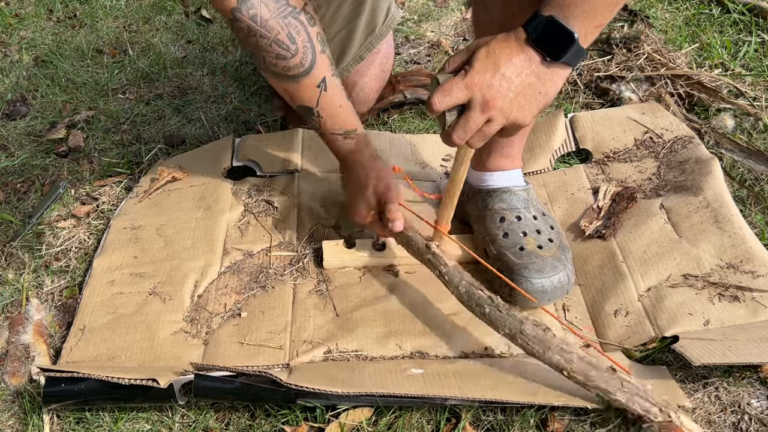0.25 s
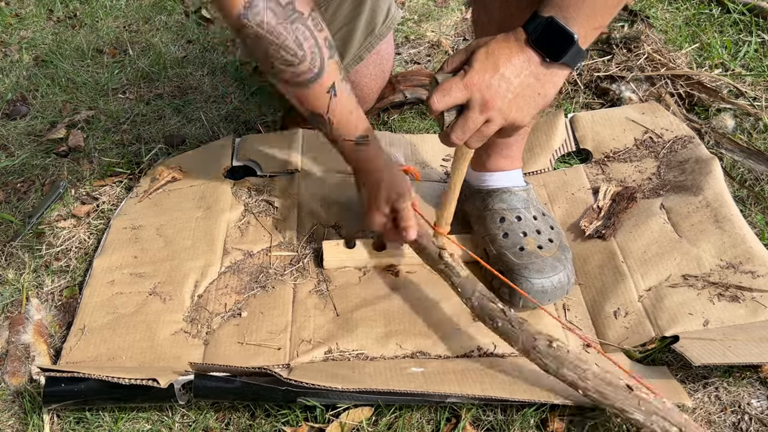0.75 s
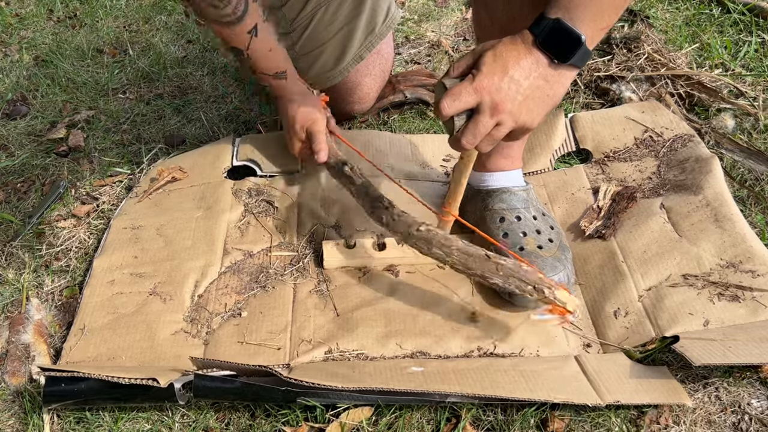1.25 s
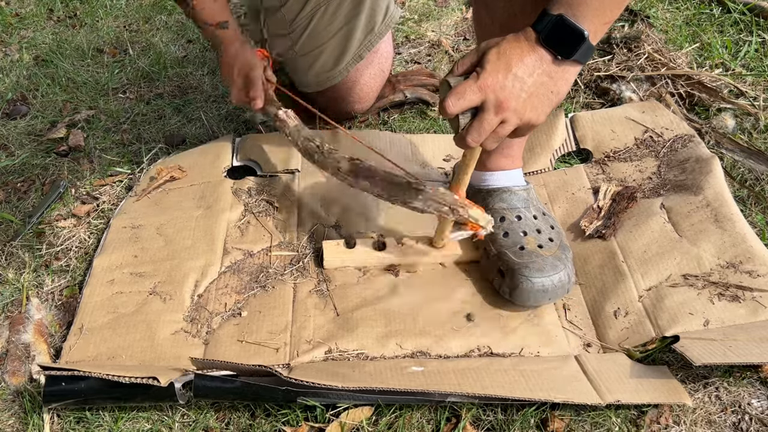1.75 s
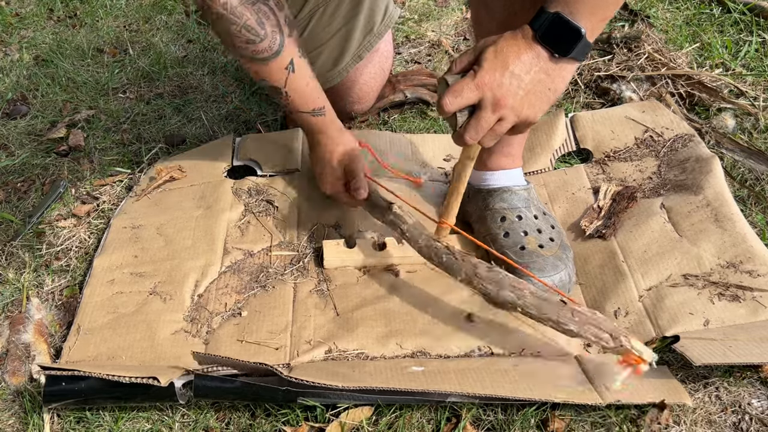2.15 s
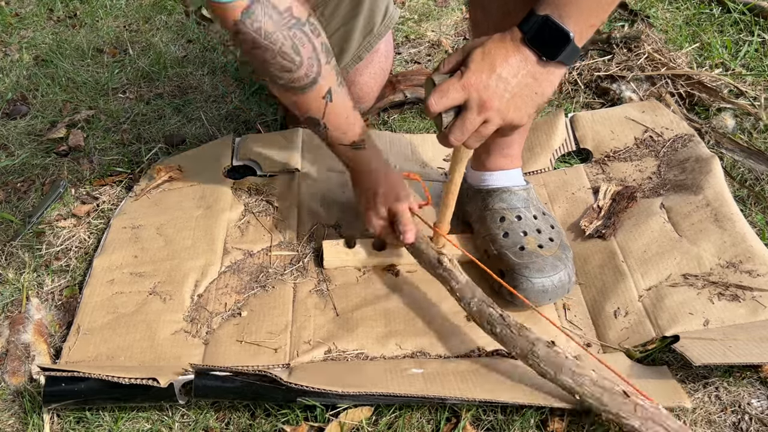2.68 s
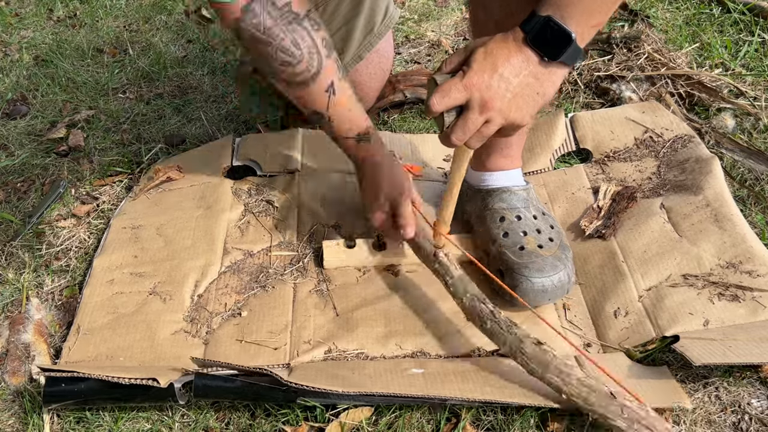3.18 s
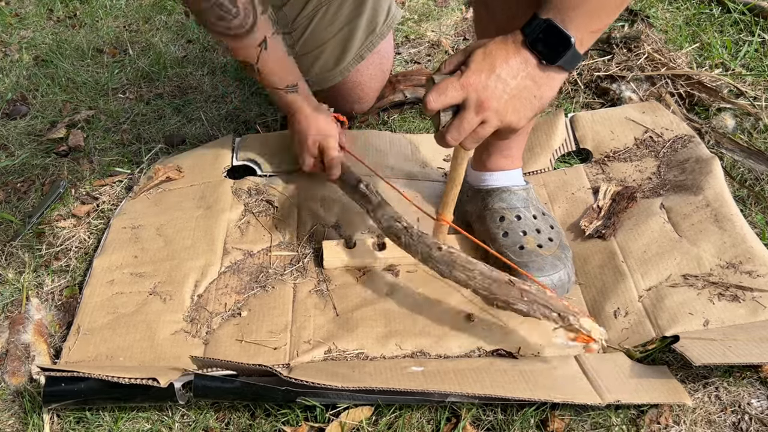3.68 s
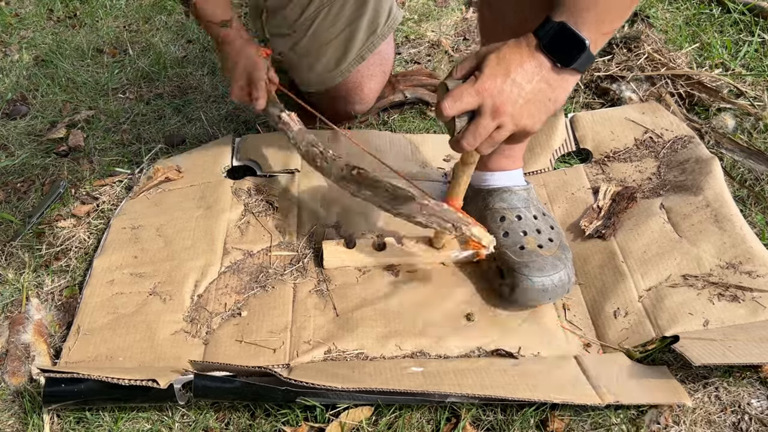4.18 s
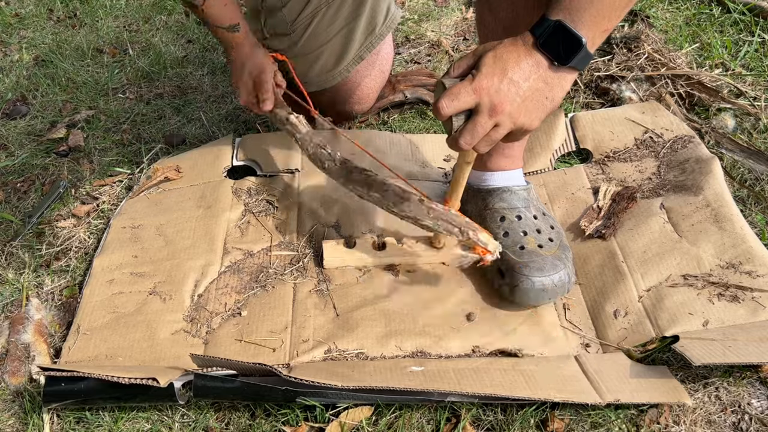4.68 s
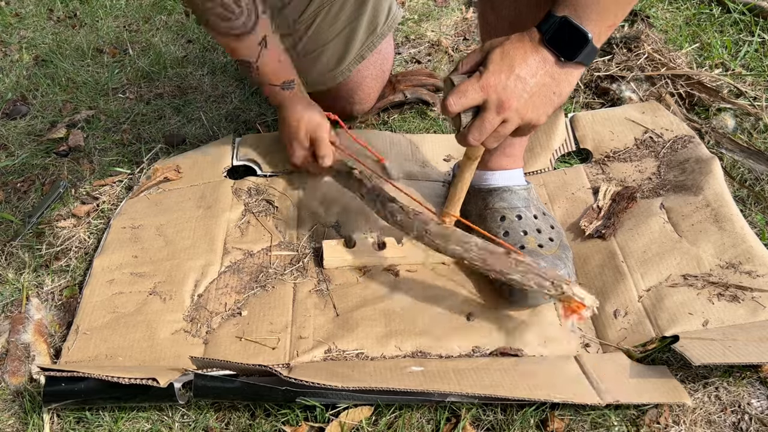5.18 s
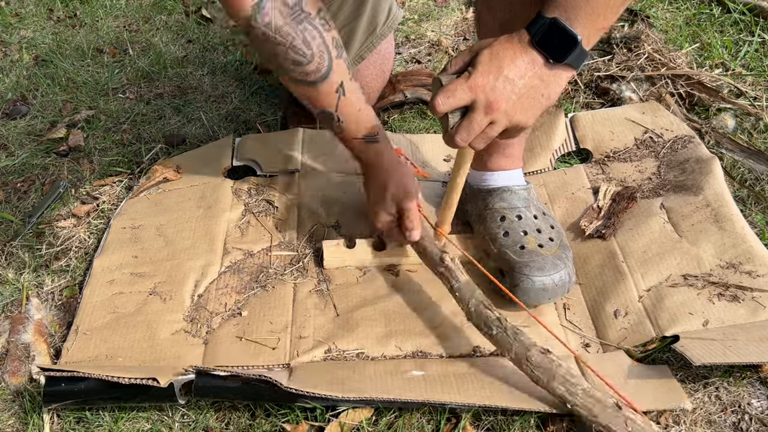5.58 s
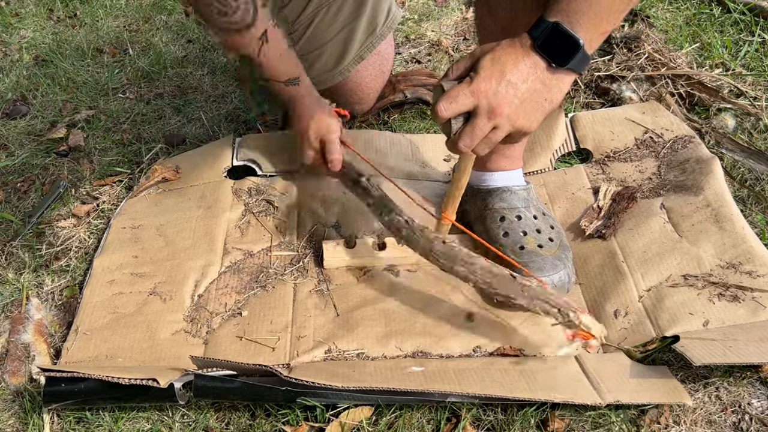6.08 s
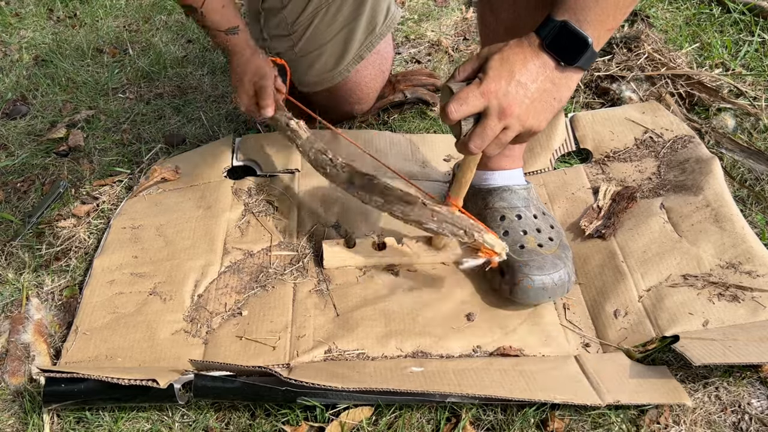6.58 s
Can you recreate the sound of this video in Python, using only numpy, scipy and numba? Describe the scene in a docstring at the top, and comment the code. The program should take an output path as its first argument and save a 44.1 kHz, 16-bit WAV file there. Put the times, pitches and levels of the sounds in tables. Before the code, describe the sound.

Outdoors in dry grass, close to a phone microphone, a cord bow spins a wooden spindle in a small board on cardboard. From 0 to nearly 7 seconds it grinds without a break, each stroke about 0.3 seconds: a stronger, boomier push, then a lighter, raspier pull. Every stroke stutters with gritty friction and a dry high hiss, its hollow tone climbing slightly. Wind buffets the microphone in deep, lumpy thumps from about 0.5 to 1.1 seconds, then dies down; small soft bumps return near 3.5 to 3.8, 5 and 6 seconds. The bow scuffs straw and card in short ticks and scrapes, with a sharper woody knock at 4.5 and a smaller one near 5.2. Behind are faint rustling leaves, a steady high insect band and a thin cricket chirping several times a second. The last stroke ends around 6.9 seconds.

```python
"""Dry grass in a field: a cord bow spins a wooden spindle in a hearth board on cardboard, close to a phone.
Each stroke grinds: random clicks ring the board's resonances as boom and rasp, and the tip's as hiss.
The bow's end scuffs card and straw in short bursts of the same kind of clicks.
Wind buffets the two microphone ports as low noise and single thumps, hardest early on.
Behind lie leaves and grass, a steady band of insects and one chirping cricket, all filtered noise."""
import sys
import numpy as np
from scipy import signal
from scipy.fft import rfft, irfft
from scipy.io import wavfile
from scipy.ndimage import uniform_filter1d
from numba import njit

SR = 44100
rng = np.random.default_rng(int(sys.argv[2]) if len(sys.argv) > 2 else 0)


def unload_audio(sound):
    """Save the sound as a 16-bit wav file, at the path given as the first command line argument."""
    columns = np.transpose(np.atleast_2d(sound))
    # keep every value between -1 and 1, then stretch to whole-number steps
    steps = np.round(np.clip(columns, -1, 1) * 32767)
    wavfile.write(sys.argv[1], SR, steps.astype(np.int16))


N = 301644

# bow strokes, push and pull in turn:
# (start [s], rasp level [dB], board boom level [dB], swell: tilt from -swell at the start to +swell at the end [dB])
BOW_STROKES = [(-0.12, -21.5, -20.5, 0), (0.189, -26.5, -26.5, 1.5), (0.493, -23, -20.5, -2.5),
               (0.783, -29, -26.5, 6.5), (1.11, -23.5, -21, -6), (1.423, -28, -27.5, 1.5),
               (1.733, -24, -21, -7), (2.032, -28.5, -29.5, 0.5), (2.334, -25, -24, -6.5),
               (2.687, -28, -23.5, -2.5), (2.938, -25, -22, -4), (3.252, -27.5, -25, -0.5),
               (3.516, -26, -21, -3.5), (3.846, -26.5, -24.5, 1), (4.139, -24, -19.5, -5),
               (4.423, -27.5, -26.5, 0.5), (4.738, -24, -22, 1), (5.016, -28, -28.5, 1.5),
               (5.345, -23, -22, -2.5), (5.633, -27, -28, 0.5), (5.935, -24.5, -23.5, 1),
               (6.241, -28.5, -30, 1), (6.544, -23.5, -21, -2.5)]
LAST_TURN_S = 6.86  # end of the last stroke
# booming modes of the hearth board: (centre [Hz], width [Hz], relative level on the push [dB], on the pull [dB])
BOOM_MODES = [(306.3, 32.6, 3.5, -5.5), (415.3, 71, -6, 1.5), (240, 180, -12.5, -7)]
# rasping modes of the board: (centre [Hz], width [Hz], relative level on the push [dB], on the pull [dB])
RASP_MODES = [(484, 230, -6.5, -9), (802, 198, -7, -4.5), (1235, 270, -4, -4.5), (1740, 480, -7.5, -8),
              (2123, 530, -10, -6), (2640, 580, -7.5, -8.5), (3050, 810, -15.5, -11.5),
              (4353, 350, -16.5, -14), (6190, 290, -22, -16)]
# spindle tip and dry fibres: (centre [Hz], width [Hz], relative level [dB])
TIP_MODES = [(4370, 810, 5.5), (6330, 650, 5.5), (8730, 1230, 5.5), (11700, 1900, 7.5), (14030, 6800, 5.5)]


def drill():
    """The tip catches and slips: slips boom in the board, grit rasps and hisses."""
    s, *levels_db = np.transpose(strokes())
    # the bow's speed ramps straight between rows; amplitude grows as its square
    speeds = np.sqrt(undb(levels_db))
    rasp_gain, boom_gain, hiss_gain = np.square(curves(np.transpose([s, *speeds])))
    chatter_db = 1.17 * walk(24.97)  # the spindle wobbles, pressure comes and goes within a turn

    slips = svf(svf(grit(1200, 0.58), 352.0, 390.0), 300.0, 550.0)
    boom_flicker_db = 0.19 * chatter_db + 2.1 * walk(12)
    boom = boom_gain * undb(boom_flicker_db) * board(slips, BOOM_MODES)
    rasp = rasp_gain * undb(chatter_db) * rasping()
    hiss_flicker_db = chatter_db + 2.7 * walk(100)
    hiss = hiss_gain * undb(hiss_flicker_db) * ring(grit(15000, 1.0), TIP_MODES)

    low = from_front(boom, 0.072, -1.0) + from_front(rasp, 0.24, -0.88)
    return low + from_side(1.6 * hiss, 0.36)


def strokes():
    """Rows of time and rasp, boom, hiss level: every stroke follows the push or pull shape, tilted by its swell."""
    # push, from a full stop, leaning in late; pull, whipped back at once, easing off early:
    # (share of the stroke's length [0-1], rasp [dB], boom [dB], hiss [dB]), relative to the stroke's levels
    push_shape = [(0, -31.5, -40, -27), (0.15, -18.5, -22.5, -10.5), (0.28, -7, -8.5, -5),
                  (0.55, 0, 1.5, -1), (0.75, -3.5, -1.5, 2), (0.88, -8.5, -11.5, -2.5)]
    pull_shape = [(0, -12.5, -15, -4.5), (0.15, -7, -17.5, -2.5), (0.33, -0.5, -1.5, 1), (0.68, -3, -1, -1),
                  (0.85, -16, -17.5, -8.5)]
    # base hiss level at a rasp of -25.5 dB [dB]; rise of hiss per dB of rasp [dB]
    base_hiss_db, hiss_follows = -39.5, 0.63
    ends = [row[0] for row in BOW_STROKES[1:]] + [LAST_TURN_S]
    rows = []
    for k, ((s, rasp_db, boom_db, swell_db), end) in enumerate(zip(BOW_STROKES, ends)):
        hiss_db = base_hiss_db + hiss_follows * (rasp_db + 25.5)
        stroke_db = (rasp_db, boom_db, hiss_db)
        for share, *shape_db in (push_shape, pull_shape)[k % 2]:
            tilt_db = swell_db * (2 * share - 1)
            rows.append((s + share * (end - s), *np.add(stroke_db, shape_db) + tilt_db))
    return rows + [(LAST_TURN_S, *np.add(stroke_db, pull_shape[0][1:]))]


def rasping():
    """Shared catches and each mode's own fibres ring the upper modes; every mode drifts and stutters alone."""
    wander_hz = 50  # spread of the modes' drift as the pressure shifts
    push, catches, out = pushing(), level(grit(700, 1.65), 0), 0
    for hz, width, push_db, pull_db in RASP_MODES:
        drift = wander_hz / hz * walk(12)
        force = 0.7 * catches + level(grit(2500, 0.6), 0)
        stutter_db = 3.4 * walk(55) + 3.2 * walk(18)
        db = -1.2 + pull_db + push * (push_db - pull_db) + stutter_db
        mode = svf(svf(force, hz, width, drift), hz, 2 * width, drift)
        out = out + undb(db) * level(mode, 0)
    return out


def board(force, modes):
    """Modes boom, passing between push and pull balance as the bow turns; the pitch climbs along each stroke."""
    climb, wander = 0.13, 0.066  # share of the pitch gained along a stroke; spread of its straying, as a share
    turns = [row[0] for row in BOW_STROKES] + [LAST_TURN_S]
    share = np.interp(np.arange(N) / SR, turns, np.arange(len(turns))) % 1
    drift = climb * (uniform_filter1d(share, size=2000) - .5) + wander * walk(9)
    pushed = ring(force, [m[:3] for m in modes], drift)
    pulled = ring(force, [m[:2] + m[3:] for m in modes], drift)
    return pushing() * pushed + (1 - pushing()) * pulled


def pushing():
    """Steady turn of the bow: 1 on the push, 0 on the pull, with short passages between."""
    push_s, cycle_s = 0.09, .605  # when the push balance peaks [s]; one push and pull [s]
    turn = np.cos(2 * np.pi * (np.arange(N) / SR - push_s) / cycle_s)
    return np.clip(.5 + 1.1 * turn, 0, 1)


def scuffs():
    """Short bursts where the bow brushes straw and card, some with a knock on the board."""
    # scuffs and ticks of the bow, levels ahead of the placing at the ports:
    # (loudest moment [s], straw crackle [dB], card scrape [dB], knock [dB], length scale [s])
    touches = [(0.083, -31, -39, -30, 0.01), (0.222, -34, -36, -28, 0.025), (0.252, -30, -26, -19.5, 0.026),
               (0.715, -32.5, -31, -21, 0.0084), (0.936, -36.5, -32, -30, 0.071),
               (1.552, -32.5, -32.5, -31.5, 0.045), (1.716, -35, -23, -48, 0.0022),
               (2.064, -38, -33, -29, 0.026), (2.121, -32, -34, -47, 0.004), (2.34, -41.5, -41, -38, 0.014),
               (2.39, -50.0, -32, -29, 0.004), (2.642, -45, -39, -26.5, 0.0061),
               (2.669, -35.5, -38.5, -44, 0.022), (2.78, -36, -46, -40, 0.01),
               (3.275, -41, -29, -26, 0.0067), (3.321, -30.5, -40, -39, 0.0055),
               (3.79, -39, -55, -50, 0.012), (4.339, -38, -28.5, -22, 0.019), (4.44, -45, -36, -32, 0.0028),
               (4.462, -33, -15.5, -23, 0.0043), (4.478, -34, -28, -29, 0.016),
               (4.497, -45, -38, -4, 0.0018), (4.503, -34, -30, -19, 0.005), (4.513, -37, -34, -26, 0.036),
               (4.922, -29, -40, -40, 0.0048), (4.935, -37, -28, -20.5, 0.016),
               (5.021, -50, -47, -32, 0.0038), (5.177, -45, -36, -16, 0.0016),
               (5.308, -38, -47, -26.5, 0.0091), (5.32, -37, -21.5, -28, 0.0018),
               (5.539, -31.5, -42, -26, 0.018), (5.68, -35, -22.5, -38, 0.0067),
               (6.213, -31.5, -34, -23, 0.0043), (6.251, -39, -38.5, -31.5, 0.044),
               (6.315, -34, -38, -28, 0.01), (6.75, -30, -48, -23.5, 0.012)]
    # cardboard under a scrape: (centre [Hz], width [Hz], relative level [dB])
    card_modes = [(1810, 760, 1.5), (2750, 390, 5.5), (3270, 620, 2.5), (4440, 530, 1.5),
                  (5560, 2000, -8.5)]
    straw, card, knock = np.zeros((3, N))
    for s, straw_db, card_db, knock_db, length in touches:
        at = slice(int(s * SR) - SR // 16, min(int(s * SR) + SR // 16, N))
        t = (np.arange(at.start, at.stop) / SR - s) / max(length, .001)
        brush = np.exp(-(t / np.where(t < 0, .48, .9)) ** 2)  # swells faster than it dies
        straw[at] += undb(straw_db) * brush
        card[at] += undb(card_db) * brush
        knock[at] += undb(knock_db) * brush
    crackle = ring(grit(12000, 0.42), TIP_MODES)
    scrape = ring(grit(5000, 1.0), card_modes, 0.11 * walk(11))  # every spot of the card rings at its own pitch
    wood = ring(grit(5000, 1.8), [m[:3] for m in BOOM_MODES + RASP_MODES[:4]])
    return from_side(2.1 * straw * crackle, 0.36) + from_front(card * scrape + knock * wood, 0.24, -2.0)


def wind():
    """Eddies rumble on the ports in a deep and an upper band, partly shared; single thumps are added."""
    # wind on the ports: (time [s], deep rumble level [dB], upper flutter level [dB])
    gusts = [(0.0, -40.5, -23.5), (0.4, -24, -48.5), (0.51, -25, -27), (0.55, -28, -52), (0.61, -18, -35),
             (0.65, -22, -23), (0.76, -10.5, -28), (0.82, -16, -27), (0.88, -15, -20), (0.93, -11.5, -24),
             (1.01, -18.5, -41), (1.05, -19, -41), (1.18, -46, -31), (1.83, -64, -32), (1.85, -45, -29.5),
             (3.29, -49, -43.5), (3.5, -24, -36), (3.75, -50, -28.5), (3.81, -26.5, -29), (4.06, -54, -46),
             (4.11, -36, -32.5), (4.23, -52, -58), (4.28, -46, -33), (4.59, -41, -33.5), (5.16, -69, -29.5),
             (5.22, -43, -23.5), (5.43, -68, -42.5), (6.02, -47, -29.5), (6.73, -47, -36.5),
             (6.84, -47, -20.5)]
    # single thumps, the deep ones eddies on a port, the higher ones perhaps jolts of the board:
    # (middle [s], level ahead of the random pan [dB], pitch [Hz])
    thumps = [(0.476, -15, 160), (0.502, -4, 94.5), (0.583, -9, 188), (0.608, -12, 126),
              (0.721, -9.5, 140.0), (0.773, -1, 88), (0.798, -8.5, 297), (0.808, -1, 165),
              (0.822, -4.5, 110), (0.843, -8, 115), (0.91, -7, 76), (0.927, -4.5, 121), (0.938, -9, 79),
              (0.948, -5, 159), (0.978, -13, 85), (1.015, -11, 90), (1.034, -3.5, 198), (1.055, -7.5, 122),
              (1.087, -10, 146), (2.225, -17, 277), (2.635, -15, 270), (2.913, -24, 165), (3.515, -17, 170),
              (3.561, -19, 123), (3.789, -14, 175), (3.809, -12, 237), (3.829, -14.5, 210),
              (4.502, -22, 298), (4.523, -18.5, 203), (4.712, -11, 246), (4.989, -15, 234),
              (5.025, -14, 325), (5.107, -14, 340), (5.143, -14.5, 207), (5.179, -12.5, 375),
              (5.229, -13, 328), (5.323, -15.5, 208), (5.337, -24, 262), (5.888, -19.5, 204),
              (5.979, -18, 234), (6.038, -16.5, 286), (6.092, -10, 306), (6.7, -8, 336), (6.789, -11, 256)]
    gust_side = 0.54  # gain of the wind that differs between the ports, against the shared wind
    deep_db, upper_db = curves(gusts)

    def rumble():
        """Lumpy noise through two low bands that follow the gusts."""
        lumps = undb(4.9 * walk(25) + 2.5 * walk(13)) * rng.standard_normal(N)
        low, high = (level(svf(svf(lumps, hz, 1.22 * hz), hz, 1.27 * hz), 0) for hz in (63., 130.))
        high = level(above(svf(high, 163.0, 220.0), 74.0), 0)
        return undb(deep_db) * low + undb(upper_db) * high

    mid, side = rumble(), rumble()
    out = np.array([mid + gust_side * side, mid - gust_side * side])
    chance = rng.random((len(thumps), 2))
    half = SR // 25
    for (s, db, hz), (turn, pan) in zip(thumps, chance):
        cycles = np.arange(-half, half) * hz / SR
        swell = np.exp(-(cycles / np.where(cycles < 0, .6, 1.3)) ** 2)
        phase = cycles + turn - 0.72 * np.minimum(cycles, 0) ** 2  # starts higher
        lump = undb(db) * swell * np.cos(2 * np.pi * phase)
        port_gains = [1 + 1.7 * (pan - .5), 1 - 1.0 * (pan - .5)]
        out[:, int(s * SR) - half:int(s * SR) + half] += np.outer(port_gains, lump)
    return out


def field():
    """Far leaves and grass in half-octave bands that flicker alone, a steady insect band and one cricket."""
    # leaves and grass: (frequency [Hz], relative level per Hz [dB])
    spectrum = [(200, -10), (320, -5), (640, -6), (1230, -9.5), (3100, -12.5), (4000, -9.5), (8200, -11.5),
                (11000, -61), (16000, -42)]
    # a cricket: middle of each chirp [s]
    chirps = [.45, .66, .85, 1.06, 1.25, 1.46, 1.64, 1.83, 2.0, 2.17, 2.38, 2.58, 2.76, 3.06, 3.41, 3.59,
              3.82, 4.24, 4.45, 4.68, 4.88, 5.09, 5.32, 5.57, 5.8, 6.09, 6.58]
    field_db = -40.5  # rms of leaves and grass over both ports
    insect_hz, insect_width_hz, insect_db = 8250., 460., -46.5
    chirp_hz, chirp_s, chirp_db = 9700., .05, -47

    hz_points, db_points = np.transpose(spectrum)
    front = side = 0
    for hz in 200 * 2 ** np.arange(0, 6.4, .5):
        db = np.interp(np.log(hz), np.log(hz_points), db_points) + 1.0 * walk(3.2)
        band = undb(db) * svf(rng.standard_normal(N), hz, hz / 3)
        if hz < 5000:
            front = front + band
        else:
            side = side + band
    leaves = level(from_front(front, 1.0, 0) + from_side(side, 0.39), field_db)

    insects = level(svf(rng.standard_normal(N), insect_hz, insect_width_hz), insect_db)
    t = np.arange(N) / SR
    singing = sum(1. * (abs(t - s) < chirp_s / 2) for s in chirps)
    wing = level(svf(svf(rng.standard_normal(N), chirp_hz, 300.), chirp_hz, 500.), chirp_db)
    insects += uniform_filter1d(singing, size=300) * wing
    return leaves + from_side(insects, 0.11)


def from_side(x, diffuse):
    """Sound that passes the right port first; a share around 6 kHz arrives scattered."""
    port_lag_s = .00015  # travel from the right port to the left
    late = irfft(rfft(x) * np.exp(-2j * np.pi * port_lag_s * SR * np.arange(N // 2 + 1) / N), N)
    scattered = diffuse * scatter(svf(x, 6400.0, 3300.0) + 1.14 * svf(x, 5700.0, 2500.0))
    return np.array([late + scattered, x - scattered])


def from_front(x, wide, pan_db):
    """Sound that meets both ports together, with a little spread from the ground around."""
    spread = wide * scatter(x)
    return np.array([undb(pan_db / 2) * (x + spread), undb(-pan_db / 2) * (x - spread)])


def scatter(x):
    """Each narrow band comes with its own lag of up to 20 ms, as off grass and card."""
    lag = np.repeat(rng.random(400), N // 800 + 1)[:N // 2 + 1] * .02
    return irfft(rfft(x) * np.exp(-2j * np.pi * np.cumsum(lag) * SR / N), N)


def grit(per_s, spread_db):
    """Random clicks, most small and a few large."""
    hit, sign, size = rng.random(N), rng.standard_normal(N), np.minimum(rng.exponential(size=N), 4.5)
    return (hit < per_s / SR) * sign * undb(spread_db * size)


def ring(x, modes, drift=0.):
    """Sum of a body's resonances, neighbours in opposite sign, rms 1."""
    total = 0
    for k, (hz, width, db) in enumerate(modes):
        total = total + (-1) ** k * undb(db) * svf(x, 1. * hz, 1. * width, drift)
    return level(total, 0)


def svf(x, hz, width, drift=0.):
    """Band-pass at hz, moved by the share drift."""
    return sweep(x, np.tan(np.pi * hz * (1 + drift) / SR) * np.ones(N), width / hz)


@njit
def sweep(x, g, k):
    """State-variable band-pass whose centre may move, gain 1 at the centre."""
    y, band, low = np.empty(len(x)), 0., 0.
    for i in range(len(x)):
        v = (band + g[i] * (x[i] - low)) / (1 + g[i] * (g[i] + k))
        band, low, y[i] = 2 * v - band, low + 2 * g[i] * v, k * v
    return y


def above(x, hz):
    """Steep high-pass."""
    return signal.sosfilt(signal.butter(4, hz, "high", fs=SR, output="sos"), x)


def walk(rate):
    """Random levels held 1 / rate s and slewed twice; spread near 1."""
    k = int(SR / rate)
    steps = np.repeat(rng.standard_normal(N // k + 1), k)
    return 0.76 * uniform_filter1d(uniform_filter1d(steps, k), k)[:N]


def curves(table):
    """Columns of a table against its first, time, sample by sample."""
    s, *columns = np.transpose(table)
    return [np.interp(np.arange(N) / SR, s, c) for c in columns]


def undb(db):
    """Gain of a level in dB."""
    return 10 ** (np.asarray(db) / 20)


def level(x, db):
    """Scale to an rms level in dB."""
    return x * undb(db) / np.sqrt(np.mean(x ** 2))


def scene():
    """Everything that reaches the two ports; all but the wind is thinned below 144 Hz."""
    return above(drill() + scuffs() + field(), 144.0) + wind()


def record(dry):
    """The phone cuts rumble, flattens the highest peaks and cuts the top."""
    top_hz = 15700
    cut = above(dry, 36.)
    flattened = np.clip(cut, -.97, .97)
    return signal.sosfilt(signal.ellip(10, .2, 75, top_hz, fs=SR, output="sos"), flattened)


dry = scene()
out = record(dry)
unload_audio(out)
```